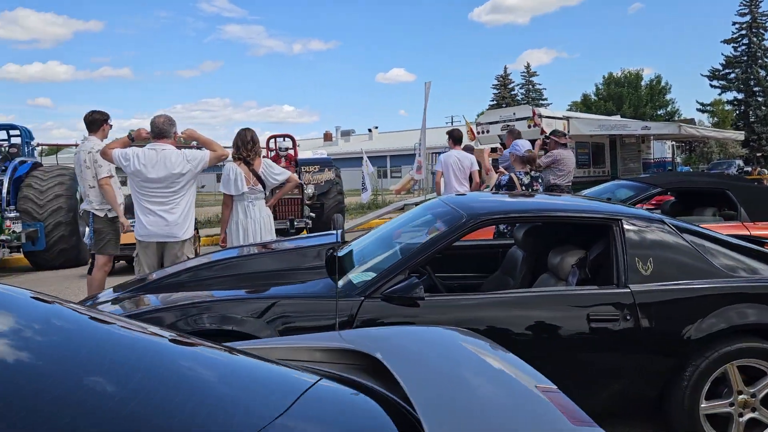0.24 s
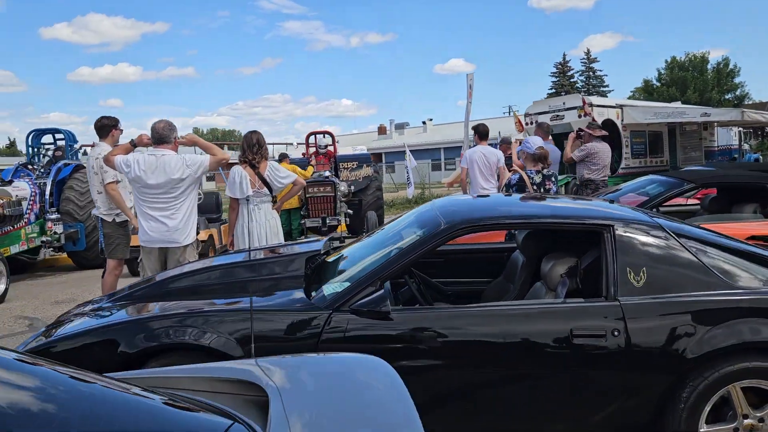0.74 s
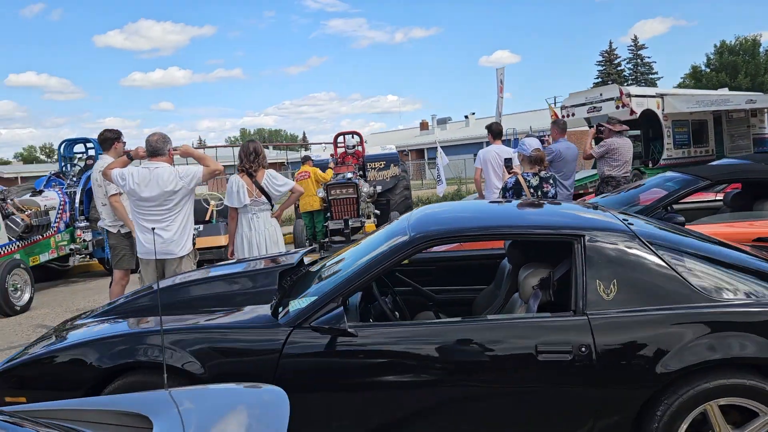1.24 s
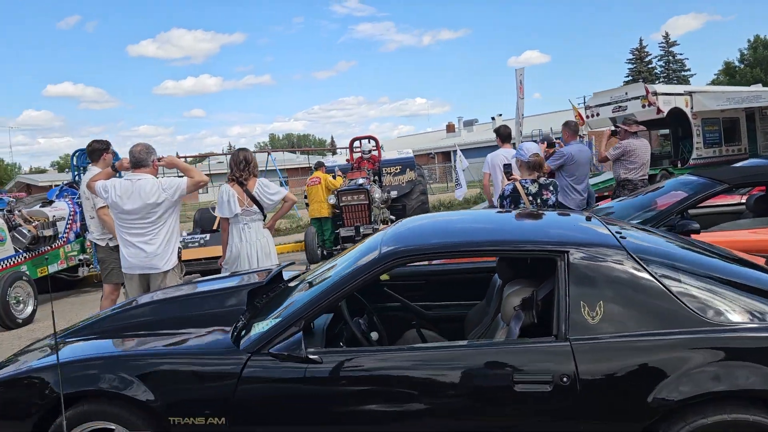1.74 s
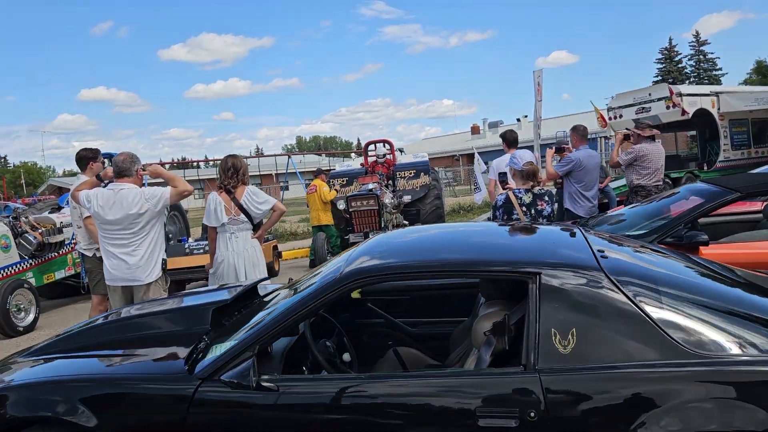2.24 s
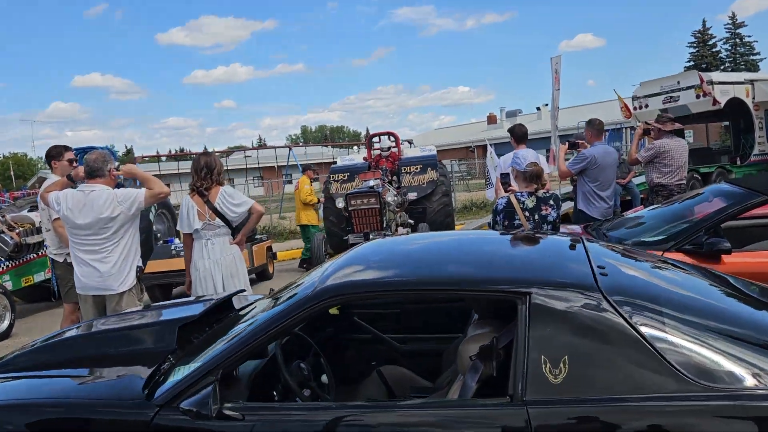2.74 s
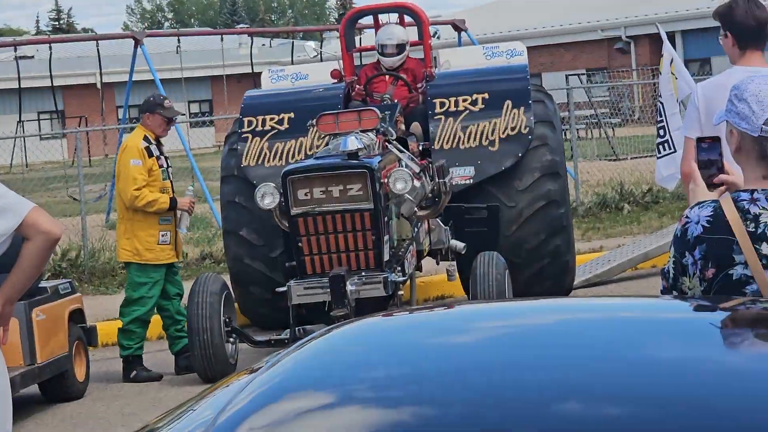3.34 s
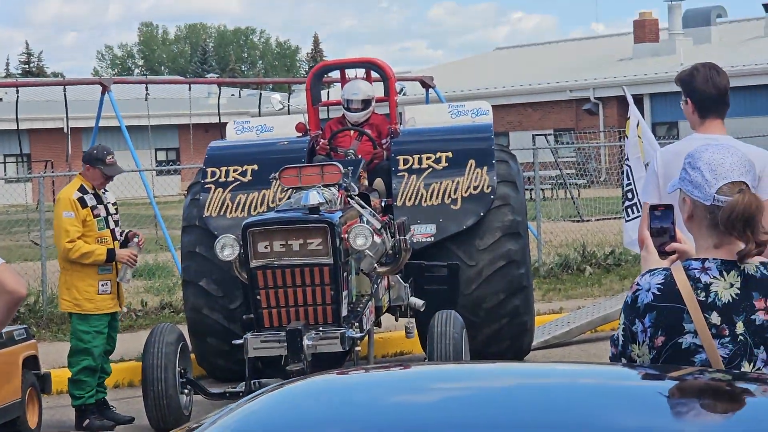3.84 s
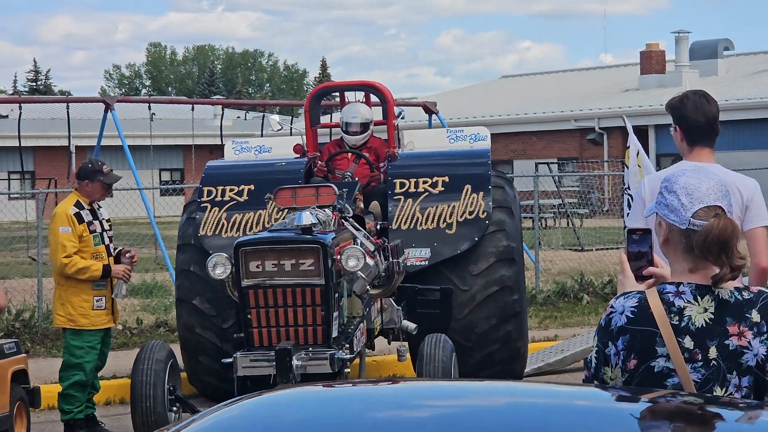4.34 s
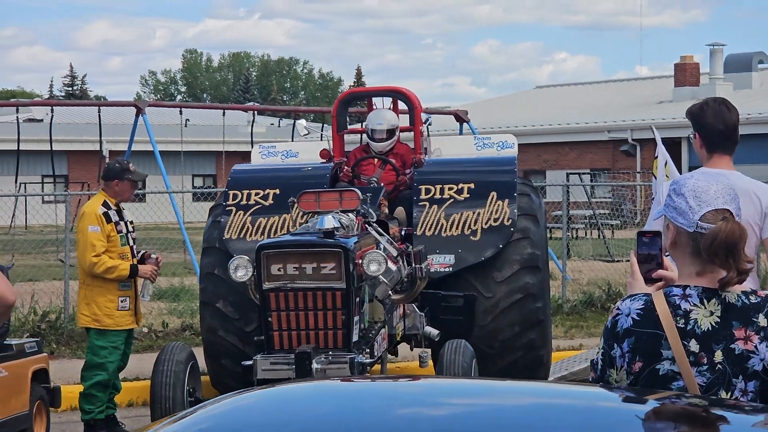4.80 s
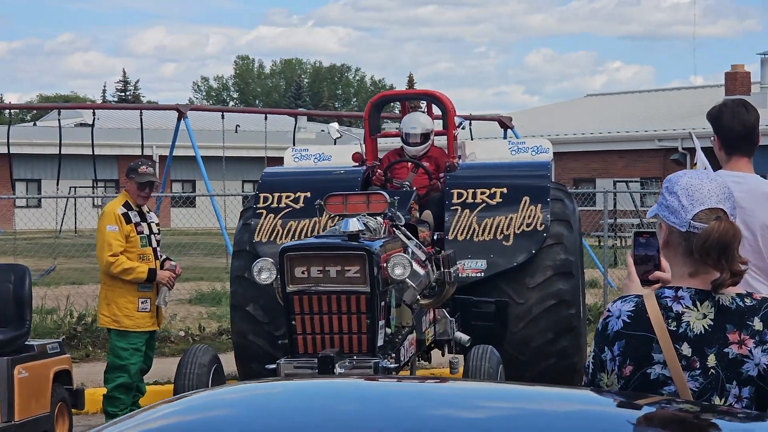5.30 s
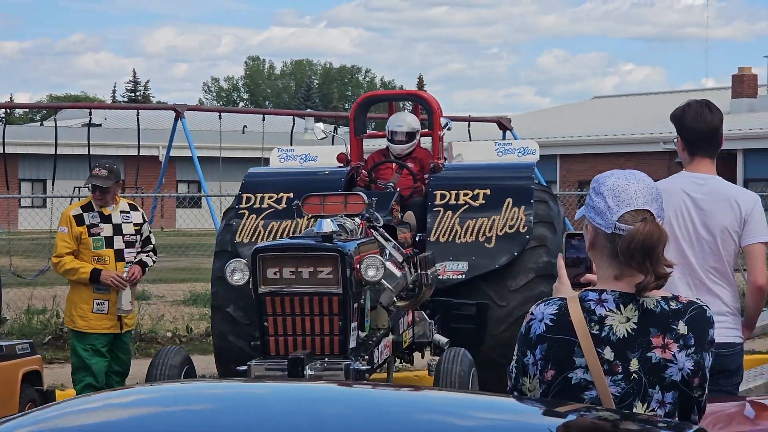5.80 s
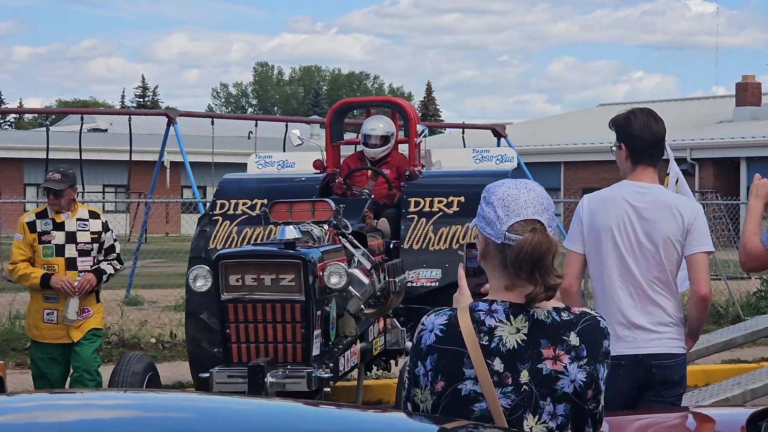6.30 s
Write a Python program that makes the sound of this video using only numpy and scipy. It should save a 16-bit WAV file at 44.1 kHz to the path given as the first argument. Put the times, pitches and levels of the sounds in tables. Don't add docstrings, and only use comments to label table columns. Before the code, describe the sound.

Already running, a big engine lopes at a rough, loud idle outdoors. The exhaust chatters fast and unevenly: deep drumming pulses, hard cracks, crisp bursts of hiss, dropped beats and sharper pops. Handheld stereo phone sound, several metres off; early on the tone shifts as parked cars reflect and partly hide it, then it opens up and stays steady to the end. Short reflections from pavement, vehicles and walls surround it.

```python
import sys
import numpy as np
from scipy import signal
from scipy.fft import rfft, irfft, next_fast_len
from scipy.io import wavfile
from scipy.ndimage import uniform_filter1d, map_coordinates

SR = 44100
rng = np.random.default_rng(int(sys.argv[2]) if len(sys.argv) > 2 else 0)


def voltage_ratio(decibels):
    exponent = np.asarray(decibels, float) / 20
    return 10 ** exponent


def file_out(sig):
    cols = np.atleast_2d(sig).T
    lim = np.clip(cols, -1, 1)
    pcm = np.round(lim * 32767).astype(np.int16)
    wavfile.write(sys.argv[1], SR, pcm)


N = 289296
T = np.arange(N) / SR
MEAN_FIRINGS_PER_S = 77.3

# start_s, firings_per_s
SPEED = [(0.0, 77.1), (0.32, 77.48), (0.66, 72.94), (0.97, 80.8), (1.41, 72.24), (1.69, 80.54),
         (2.12, 75.22), (2.57, 78.4), (2.88, 75.9), (3.23, 79.21), (3.58, 75.57), (4.1, 81.04),
         (4.49, 74.85), (4.89, 80.82), (5.28, 75.12), (5.58, 80.14), (6.29, 75.6), (6.56, 77.97)]
# start_s, view_db
VIEW = [(0, -3), (.7, -2.5), (1.3, -4), (1.7, -2.5), (2.2, -4.5), (2.35, -1.5), (2.55, -3), (2.8, 1),
        (3.1, 0.06), (4.0, 0.04), (4.8, 0), (5.6, -0.83), (6.56, -0.46)]
# start_s, first peak of the ground echo peak_hz, echo_share (0-1),
# microphone port resonance port_hz, its gain port_db
PLACE = [(0.0, 636, 0.2, 7340, 10.5), (1.0, 710, 0, 7050, 9.5), (1.68, 783, 0.3, 6650, 11),
         (2.15, 740, 0.7, 7140, 11), (2.5, 700, 1, 4620, 8.5), (2.9, 680, 1, 6260, 1),
         (3.4, 665, 0.66, 6600, 7), (4.2, 682, 1, 6700, 5), (5.1, 745, 0.26, 6460, 7.5),
         (6.1, 792, 0.16, 6370, 7), (6.56, 725, 0.05, 6600, 6)]


def firings(crank, contrast=1.29, chance_db=1.45):
    # cylinder, usual strength_db, then the jet's tint low_db, middle_db, top_db
    cylinder_habits = [(0, -13, 5.5, 0.52, -12), (1, 3.5, -1.5, -1.9, 1.5), (2, 4, 5.5, -0.74, 1.5),
                       (3, 2, 4, 0.96, 4), (4, 5, 0.5, 0.97, 4.5), (5, -6, 4, 0.22, 3),
                       (6, -1.5, 2.5, 0.91, 0), (7, -2, 2.1, -0.81, 2.5)]
    # start_s, over_usual_db
    lazy_bangs = [(0.097, 9.5), (0.303, 7.5), (0.835, 11), (1.037, 10.5), (1.46, 10.5), (1.668, 9),
                  (1.768, 8.5), (1.973, 6), (2.183, 9), (2.393, 9), (2.598, 10.5), (2.91, 7.5), (3.014, 9),
                  (3.22, 7.5), (3.529, 7.5), (3.634, 8), (3.841, 8.5), (3.943, 7), (4.345, 8.5),
                  (4.555, 10.5), (4.762, 8), (5.167, 3), (5.582, 8.5), (5.885, 7), (6.301, 10.5), (6.51, 8)]
    # start_s, over_usual_db
    misfires = [(0.019, -7), (0.045, -9), (0.676, -20), (0.886, -10), (1.024, -18), (1.1, -22),
                (1.177, -22), (1.378, -16), (1.405, -34), (1.5, -13), (1.806, -13), (1.934, -9),
                (2.117, -25), (2.143, -4.5), (2.21, -23), (2.328, -26), (2.432, -22), (2.727, -13),
                (2.845, -40), (2.936, -10), (3.968, -11), (4.191, -13), (4.28, -4.5), (4.888, -21),
                (5.089, -21), (5.115, -5), (5.207, -18), (5.403, -9), (6.117, -8), (6.235, -7)]
    # start_s,
    # over_usual_db
    odd_firings = [(0.149, -3), (0.162, -10), (0.2, -15), (0.33, -5), (0.356, 0.5), (0.434, -4),
                   (0.567, -15), (0.58, -4.5), (0.823, -2), (1.139, -11), (1.323, -6), (1.819, -12),
                   (3.118, -5), (3.66, -3), (3.981, -6.5), (4.166, -11), (4.699, 1), (5.706, -7),
                   (6.327, -2),
                   (0.369, 1.5), (0.54, 6), (0.553, -3), (0.689, 1.5), (0.999, 2), (1.27, 5), (1.283, 2),
            (1.31, 3), (1.579, 14), (1.882, 9), (1.986, 8), (2.038, 2.5), (2.483, 3.5), (2.509, 16.5),
            (2.586, 1), (2.792, 2.5), (3.04, 3.5), (3.232, 13.5), (3.437, 13), (4.055, 12.5), (4.141, 0.5),
            (4.306, 2.5), (4.437, 6), (4.634, 9), (4.674, 16), (5.154, 7), (5.468, 6), (5.988, 6.5),
            (6.222, 3), (6.432, 5.5),
                   (0.007, 10), (0.059, -1), (0.343, 0), (0.636, 8), (0.731, 5.3), (0.771, -0.5),
                    (0.797, 0.5), (0.81, -2), (0.95, 14), (0.987, 3), (1.218, 4.0), (1.42, 3), (1.619, 4),
                    (1.657, 4), (1.682, 11), (1.744, 7), (1.757, -1), (2.131, 1), (2.158, 7), (2.303, 9),
                    (2.342, 1), (2.368, 5), (2.561, 3.5), (2.638, 1.7), (2.715, -0.6), (3.144, 2.5),
                    (3.246, 0), (3.271, -2), (3.296, -1), (3.503, 8.5), (3.556, 1), (3.569, -2), (4.043, 3),
                    (4.18, 1), (4.359, 12), (4.398, 2.5), (4.609, 2), (4.622, 1.5), (4.713, 2), (4.738, 7),
                    (4.851, 2.5), (4.864, 1), (4.938, 5.5), (5.039, 2), (5.233, 0), (5.352, 9.5),
                    (5.392, 7), (5.557, 4.5), (5.62, 0.5), (5.645, -2), (5.683, -1), (5.963, 8.5),
                    (6.079, 2.8), (6.262, 2), (6.276, 5), (6.315, 11), (6.446, -2.5), (6.524, 12),
                   (0.085, -5), (0.279, 3), (0.514, -6), (0.622, -9), (0.65, -0.5), (0.875, -1),
                    (0.963, -5.9), (1.126, -0.5), (1.257, -5), (1.448, -4.5), (1.554, -5), (1.567, -2),
                    (1.871, -3), (2.0, -6), (2.198, -3.4), (2.224, -1.9), (2.263, -12), (2.523, -3),
                    (2.819, -15), (2.859, 0.4), (3.182, 0), (3.765, -2.5), (3.905, -1.7), (4.081, -1),
                    (4.385, 1.7), (4.839, -12), (4.901, 0), (5.22, 0.7), (5.379, -4), (5.733, -0.3),
                    (5.746, -1.7), (5.809, -12), (6.144, -2.1), (6.17, -1), (6.472, -0.2)]

    number = np.arange(int(crank[-1]) + 1)
    times = np.interp(number, crank, T)
    cylinder = np.array(cylinder_habits)[number % len(cylinder_habits)]
    luck = np.clip(rng.standard_normal(len(number)), -2, 2)
    odd_db = chance_db * luck + np.interp(times, T, stumble_db())
    for s, db in lazy_bangs + misfires + odd_firings:
        odd_db[abs(times - s).argmin()] = db
    return times, contrast * (cylinder[:, 1] + odd_db), cylinder[:, 2:]


def stumble_db():
    # start_s, length_s, change_db
    stumbles = [(.234, .036, -13), (.377, .049, -9), (.589, .051, -10), (2.06, .036, -8), (2.683, .036, -8),
                (3.393, .036, -8), (3.602, .024, -4), (4.11, .024, -6), (4.314, .024, -5),
                (5.652, .036, -6), (5.75, .036, -6), (6.177, .037, -8)]
    return sum(db * (T > s) * (T < s + length) for s, length, db in stumbles)


def level(layer):
    # open_view_db, db_per_view_db, db_per_firing_per_s above mean pace, db_per_stumble_db
    layers = [
        (-19, 1.0, .5, 0.8),
        (-17.5, 1.44, -0.12, 0.15),
        (-25, 1.4, -0.07, 0.5),
        (-25.5, 1.38, -0.04, 0.3),
    ]
    open_db, by_view, by_pace, by_stumble = layers[layer]
    view_db = column(VIEW, index=1)
    pace = (column(SPEED, index=1) - MEAN_FIRINGS_PER_S) * (1.5 - 0.3 * view_db)
    starved_db = uniform_filter1d(stumble_db(), size=800)
    return voltage_ratio(open_db + by_view * view_db + by_pace * pace + by_stumble * starved_db)


def tone(crank, flutter_db=1.66):
    harmonics = [(1, -2, 0.31), (2, -7.5, 0.37), (3, -13, 0.355)]
    wobble = colour(rng.standard_normal(N), [(4, -2), (12, 1), (35, -9), (60, -69)])
    flutter = voltage_ratio(flutter_db * evened(wobble))
    orders = sum(voltage_ratio(db) * np.cos(2 * np.pi * k * (crank - lag)) for k, db, lag in harmonics)
    return level(layer=0) * np.sqrt(2) * flutter * orders


def lope(crank):
    between = (1.5, -31, 0.85)
    multiple, db, by_sag = between
    sag = (MEAN_FIRINGS_PER_S - column(SPEED, index=1)) * (2.0 - 0.3 * column(VIEW, index=1))
    wave = np.sqrt(2) * np.cos(2 * np.pi * multiple * crank)
    return voltage_ratio(db + by_sag * sag) * (0.063 + behind_car()) * wave


def pipes(times, strength_db, follow=0.24, scatter=0.38, jitter_s=0.001, lead_s=0.00045):
    # mode_hz, width_hz, level_db
    pipe_modes = [(32, 24, -22), (55.4, 28, -7), (112.2, 19.3, 1), (122.7, 8.9, -23), (181, 16.7, 1),
                  (215.1, 19.4, 0.5), (250.4, 20.3, -1.5), (273.2, 23, -10.5), (432, 59, -9)]
    chance = rng.standard_normal((len(times), len(pipe_modes) + 1))
    sizes = voltage_ratio(follow * strength_db)
    blow_times = times - lead_s + jitter_s * chance[:, -1]
    ring = 0
    for (hz, width, db), luck in zip(pipe_modes, chance.T):
        blows = train(blow_times, sizes - 0.67 * sizes.mean() + scatter * luck)
        mode = resonate(resonate(blows, hz, 1.19 * width), hz, 1.19 * width)
        ring = ring + voltage_ratio(db) * mode / width
    ring = colour(ring, [(20, -20), (33, -2.0), (285, -0.5), (340, -3), (600, -15)])
    return level(layer=1) * steadied(ring, span_s=0.098)


def bark(times, strength_db, follow=0.55, crack_follow=1.0, scatter_db=1.5, slap=0.71):
    # tone_hz, level_db
    bark_colour = [(250, -37), (430, -7), (600, 3.5), (750, 8), (1000, 3), (1450, -9.5), (2200, -17),
                   (3500, -28), (6000, -9.5)]
    luck = rng.standard_normal((len(times), 3))
    gas = port_pair(lag=4)
    mouth_hz = column(PLACE, index=1)

    sizes = voltage_ratio(follow * strength_db + scatter_db * luck[:, 0])
    rough = puffs(times - .0062, sizes, rise_s=0.00076, hold_s=0.0013, fall_s=0.0069) * gas
    slaps = train(times - .0045 + .001 * luck[:, 1], -sizes)
    body = colour(evened(rough) + slap * evened(slaps), bark_colour)

    hard = voltage_ratio(crack_follow * strength_db + 3.5 * luck[:, 2])
    crack = puffs(times - .0045, hard, rise_s=0.00034, hold_s=0.0017, fall_s=0.0069) * gas
    snaps = train(times - .004 + 0.00079 * luck[:, 1], hard)
    crack = evened(crack) + 0.21 * evened(snaps)

    ring = []
    octave_hz = 1.994 * mouth_hz
    for b, c in zip(evened(body), evened(crack)):
        high_ring = resonate(resonate(c, octave_hz, 240), octave_hz, 240)
        ring.append(1.66 * resonate(b, mouth_hz, 155) + voltage_ratio(11.5) * high_ring)
    bright = colour(evened(crack), [(700, -6), (1300, 4), (2400, 0), (4000, -18)])
    near = evened(body) + np.array(ring) + voltage_ratio(-1.0) * bright
    around = panel(ground(near + voltage_ratio(-8.0) * yard(near)))

    hidden_db = -5.5 / (1 + np.exp((T - 1.43) / 0.043))
    return voltage_ratio(hidden_db) * level(layer=2) * steadied(around, span_s=0.235)


def jet(times, strength_db, tint_db, tint_chance_db=1.8):
    band_edges = [0, 4500, 9000, SR / 2]
    # fall_s, steady_leak (share)
    band_flow = [
        (0.0045, 0.084),
        (0.005, 0.057),
        (0.0044, 0.014),
    ]
    # tone_hz, level_db
    left_colour = [(800, -8), (1800, 1), (3000, 1.5), (4500, -0.5), (6000, -0.5), (7500, 4.5), (9300, -2.5),
                   (11000, 1.5), (13000, 0), (16000, -6)]
    # tone_hz, level_db
    right_colour = [(800, -1.5), (1800, 2), (3000, 1.5), (4500, 1), (6300, 1.5), (8700, 4.5), (9700, -12.5),
                    (11500, -5), (14500, -1), (16000, -6.5)]

    gas = rfft(port_pair(lag=9.52))
    hz = np.fft.rfftfreq(N, 1 / SR)
    tint_db = tint_db + tint_chance_db * rng.standard_normal(tint_db.shape)
    eddies = evened(uniform_filter1d(rng.standard_normal(N), size=24))
    grain = voltage_ratio(2.45 * np.clip(eddies, -3, 2))
    hiss = 0
    for low_hz, top_hz, db, (fall_s, leak) in zip(band_edges, band_edges[1:], tint_db.T, band_flow):
        flow = puffs(times - .004, voltage_ratio(strength_db + db), rise_s=.002, hold_s=.0017, fall_s=fall_s)
        band = irfft(gas * (hz >= low_hz) * (hz < top_hz), N)
        hiss = hiss + (flow * grain + leak) * band

    left, right = glint(panel(ground(hiss)))
    port = voltage_ratio(column(PLACE, index=4)) * resonate(right, column(PLACE, index=3), 1180)
    near = np.array([colour(left, left_colour), colour(right + port, right_colour)])
    drifting = 0
    for k in range(3):
        swell = np.sqrt(2 / 3) * np.cos(np.pi * (3 * T + k / 3))
        drifting = drifting + yard(near * swell)
    wet = colour(drifting, [(1000, -5.0), (4000, -6.5), (6500, -8.0), (8500, -9.5), (10000, -19.5), (16000, -5)])
    mixed = mottled(near, depth_db=2.5) + mottled(wet, depth_db=3.5)
    return voltage_ratio(5.5) * level(layer=3) * steadied(mixed)


def puffs(times, sizes, rise_s, hold_s, fall_s):
    t = np.arange(round(.04 * SR)) / SR
    rise = np.sin(np.pi / 2 * np.clip(t / rise_s, 0, 1)) ** 2
    shape = rise * np.exp(-(np.maximum(t - rise_s - hold_s, 0) / fall_s) ** 2)
    return signal.oaconvolve(train(times, sizes), shape)[:N]


def mottled(x, depth_db):
    z = signal.stft(x, nperseg=256, noverlap=192)[2]
    patches = uniform_filter1d(rng.standard_normal(z.shape[1:]), size=2, axis=0)
    patches = uniform_filter1d(patches, size=8, axis=1)
    return signal.istft(z * voltage_ratio(depth_db * evened(patches)), nperseg=256, noverlap=192)[1][:, :N]


def glint(x):
    # middle_s, span_s, band_hz, width_hz, gain
    bright_band = (0.98, 0.39, 4500, 830, 1.35)
    s, span_s, hz, width, gain = bright_band
    moment = np.exp(-((T - s) / span_s) ** 2)
    return x + gain * moment * np.array([resonate(c, hz, width) for c in x])


def panel(x):
    # start_s, left_delay_ms, right_delay_ms
    panel_delay = [(0, .25, .97), (.3, .38, 1.03), (.75, .45, 1.13), (1.1, .68, 1.22), (2, 1.08, 1.4),
                   (3, 1.2, 1.45), (4.75, 1.2, 1.33), (5.25, 1.15, 1.22), (6.56, 1.1, 1.12)]
    # start_s, left_share (0-1), right_share (0-1)
    panel_share = [(0, 0.7, 0.24), (.5, 0.34, 0.43), (1.1, 0.44, 0.65), (1.7, 0.3, 0.44), (2.3, 0, 0),
                   (3.2, 0.05, 0), (4, 0.2, 0.36), (5.2, 0, 0.35), (6.56, 0.25, 0.02)]
    # start_s, left_delay_ms, right_delay_ms,
    # left_share (0-1), right_share (0-1)
    flank_echo = [(0, .8, .8, .2, .5), (.7, .92, .9, .5, .5), (.9, 1.2, .92, .3, .45),
                  (1.4, 1.3, .95, .4, .3), (2, 1.4, 1, .3, 0), (2.3, 1.4, 1, 0, 0)]
    echo = []
    for k in range(2):
        body = column(panel_share, index=k + 1) * delayed(x[k], column(panel_delay, index=k + 1) / 1000)
        flank = column(flank_echo, index=k + 3) * delayed(x[k], column(flank_echo, index=k + 1) / 1000)
        echo.append(body + flank)
    return x + colour(np.array(echo), [(1200, -18), (2000, -0.5), (6000, -5.0), (10000, -40)])


def ground(x):
    share = np.clip(column(PLACE, index=2), 0, 1)
    delay_s = 1 / column(PLACE, index=1)
    echo = np.array([delayed(c, delay_s) for c in np.atleast_2d(x)])
    return x + share * colour(echo, [(1000, -6.5), (1800, -7.0), (3000, -26.0)])


def behind_car():
    return np.exp(-((T - 2.37) / 0.99) ** 2)


def null(x):
    null_hz = 0.58 * column(PLACE, index=1)
    band = np.array([resonate(c, null_hz, 230) for c in x])
    return x - 0.39 * behind_car() * band


def yard(x, gap_s=0.013):
    # tone_hz, t60_s (time to fall by 60 dB)
    yard_decay = [(100, 0.71), (1000, 0.97), (5000, 1), (10000, 0.96), (16000, 0.72)]
    taps = rng.choice([-1., 0, 1.], (2, SR // 2), p=[.025, .95, .025])
    hz, t, z = signal.stft(taps, SR, nperseg=256)
    decay_hz, decay_s = np.transpose(yard_decay)
    t60 = np.interp(np.log(hz + 1), np.log(decay_hz), decay_s)
    tail = signal.istft(z * voltage_ratio(-60 * t / t60[:, None]), SR, nperseg=256)[1]
    tail = tail / np.linalg.norm(tail, axis=1, keepdims=True)
    tail = np.pad(tail, ((0, 0), (round(gap_s * SR), 0)))
    return signal.fftconvolve(np.atleast_2d(x), tail, axes=1)[:, :N]


def air_wash():
    # tone_hz, level_db
    air_colour = [(18, -24), (30, -15), (45, -9.5), (100, -4), (400, -18.5), (2000, -37.5), (8000, -39.5),
                  (16000, -39)]
    wash = evened(colour(port_pair(lag=1), air_colour))
    return voltage_ratio(-28.5 + 0.44 * column(VIEW, index=1)) * wash


def port_pair(lag):
    # tone_hz, likeness (0-1)
    port_likeness = [(300, 0.98), (1000, 1), (2000, 0.86), (4000, 0.65), (8000, 0.6), (16000, 0.32)]
    a, b = rng.standard_normal((2, N))
    hz, same = np.transpose(port_likeness)
    same = np.clip(same, .01, .99)
    shared = colour(np.roll(a, round(lag)), np.c_[hz, 20 * np.log10(same)])
    own = colour(b, np.c_[hz, 10 * np.log10(1 - same ** 2)])
    return np.array([a, shared + own])


def evened(x):
    return x / np.sqrt(np.mean(x ** 2) + 1e-20)


def steadied(x, span_s=0.388):
    power = uniform_filter1d(np.atleast_2d(x ** 2).mean(0), round(span_s * SR))
    return x / np.sqrt(abs(power) + 1e-12)


def column(rows, index):
    rows = np.array(rows)
    return np.interp(T, rows[:, 0], rows[:, index])


def colour(x, points):
    hz, db = np.transpose(points)
    size = next_fast_len(N + 4096)
    bins = np.log(np.fft.rfftfreq(size, 1 / SR) + 1)
    gain = voltage_ratio(np.interp(bins, np.log(hz), db))
    return irfft(rfft(x, size) * gain, size)[..., :N]


def resonate(x, hz, width):
    turn = np.exp(2j * np.pi * np.cumsum(hz * np.ones(N)) / SR)
    r = np.exp(-np.pi * width / SR)
    return 2 * (turn * signal.lfilter([1 - r], [1, -r], x / turn)).real


def train(times, sizes):
    out = np.zeros(N)
    np.add.at(out, np.clip(np.round(times * SR).astype(int), 0, N - 1), sizes)
    return out


def delayed(x, delay_s):
    return map_coordinates(x, [np.arange(N) - delay_s * SR], order=3)


def scene():
    stub_lead = [.3, .9, .4, 1, 1.6, .5, 0, .5]
    crank = -0.54 + np.cumsum(column(SPEED, index=1)) / SR
    times, strength_db, tint_db = firings(crank)

    low = tone(crank) + lope(crank) + pipes(times, strength_db)
    lean_db = np.outer([1, -1], .05 + .12 * column(VIEW, index=1))
    low_tail = colour(yard(low), [(70, -2.5), (140, -1), (300, 4.0)])
    low = low * voltage_ratio(lean_db) + voltage_ratio(-16.5) * low_tail

    jet_times = times - np.resize(stub_lead, len(times)) / 1000
    hiss = jet(jet_times, strength_db, tint_db)
    return null(low + bark(times, strength_db) + air_wash()) + hiss


def roll_off(x):
    return signal.sosfilt(signal.butter(12, 17000, fs=SR, output="sos"), x)


def record(dry):
    limited = 1.16 * np.tanh(dry / 1.149)
    edge = signal.firwin(301, 16000, window=("kaiser", 9), fs=SR)
    return roll_off(signal.oaconvolve(limited, edge[None], "same"))


dry = scene()
out = record(dry)
file_out(out)
```